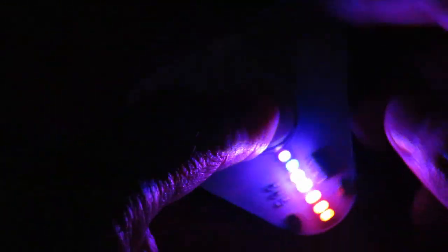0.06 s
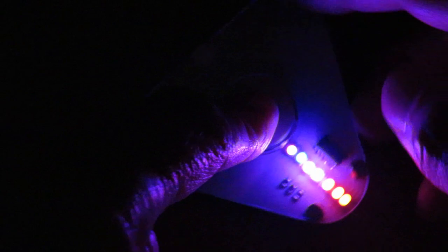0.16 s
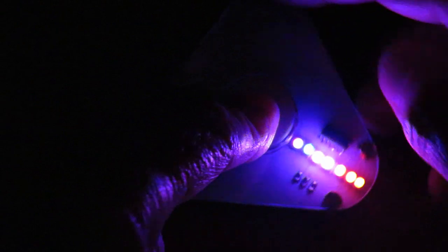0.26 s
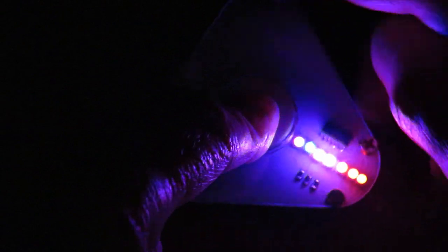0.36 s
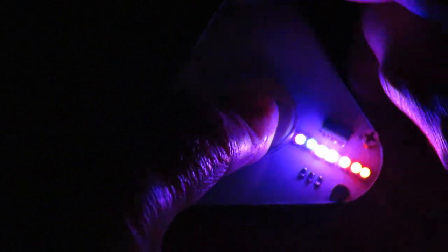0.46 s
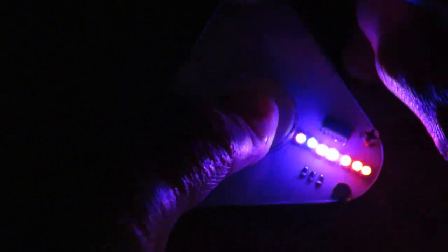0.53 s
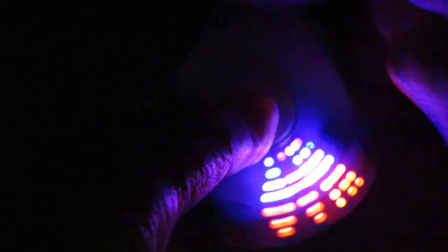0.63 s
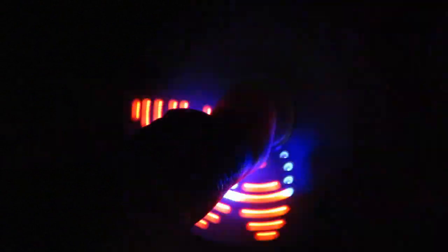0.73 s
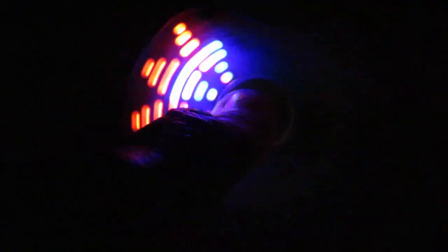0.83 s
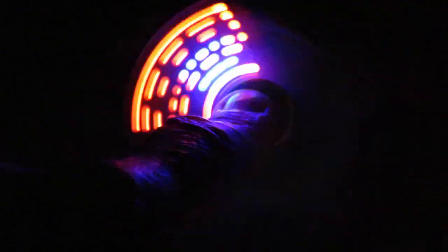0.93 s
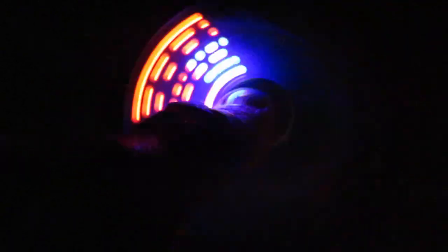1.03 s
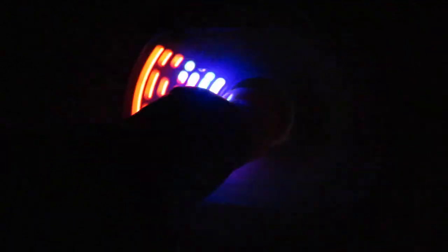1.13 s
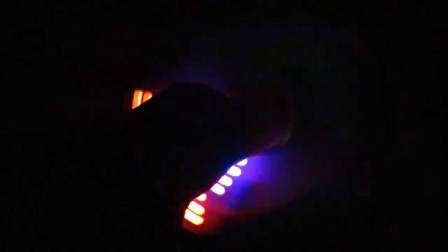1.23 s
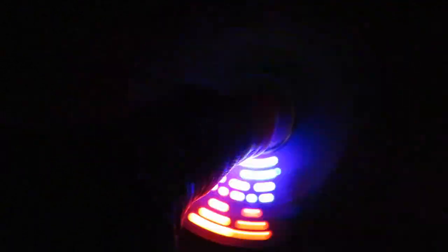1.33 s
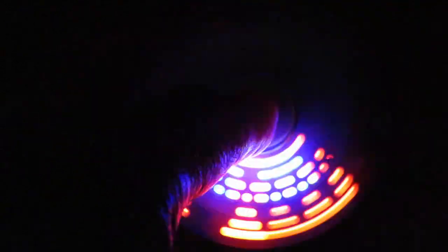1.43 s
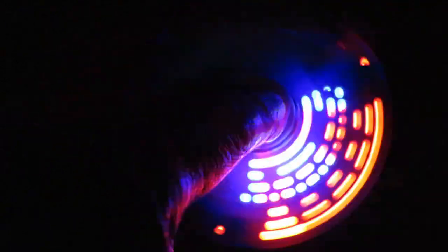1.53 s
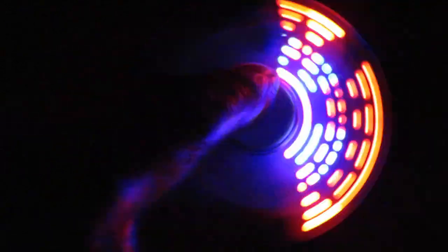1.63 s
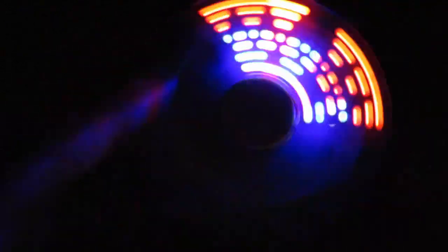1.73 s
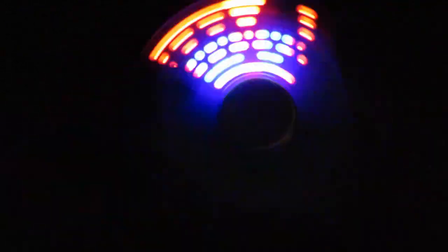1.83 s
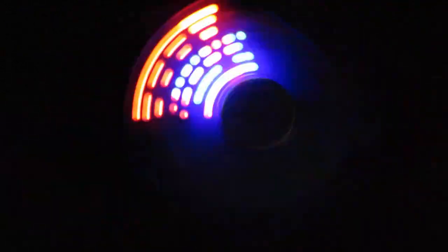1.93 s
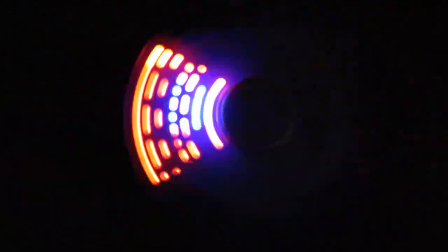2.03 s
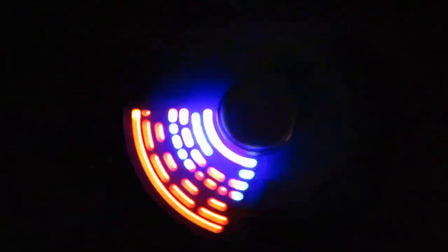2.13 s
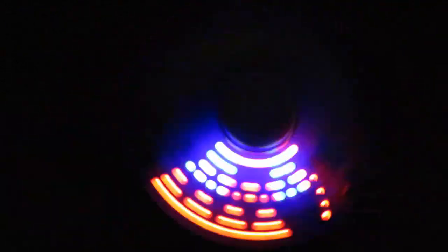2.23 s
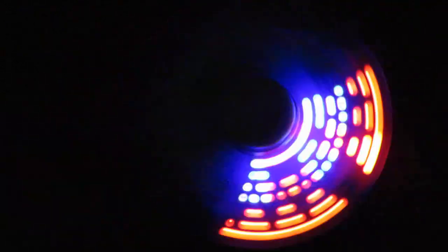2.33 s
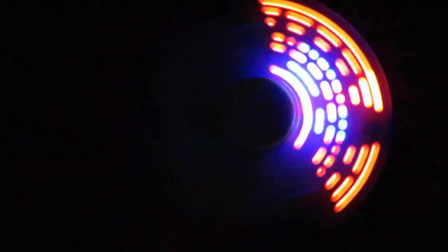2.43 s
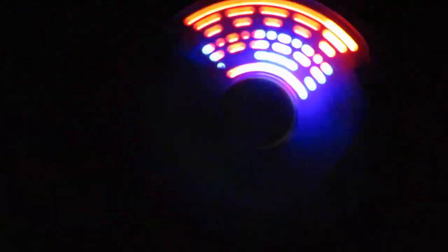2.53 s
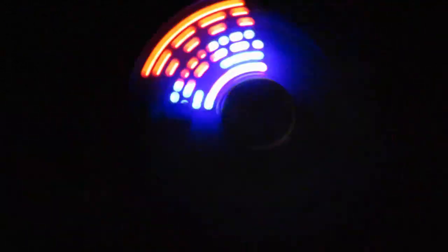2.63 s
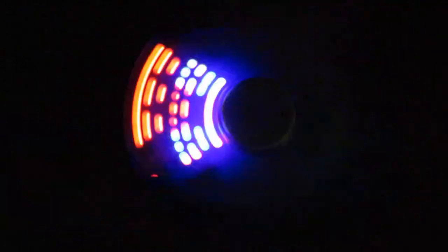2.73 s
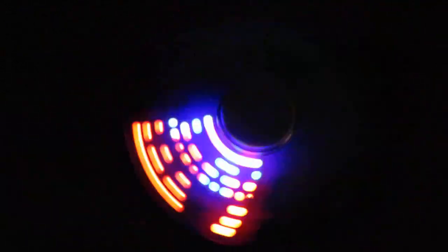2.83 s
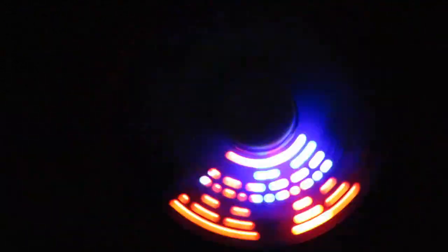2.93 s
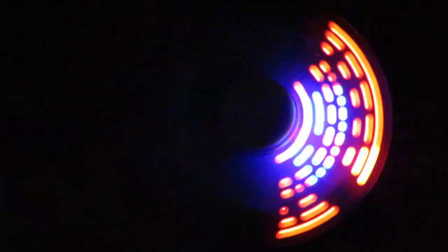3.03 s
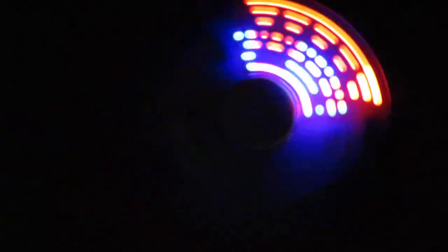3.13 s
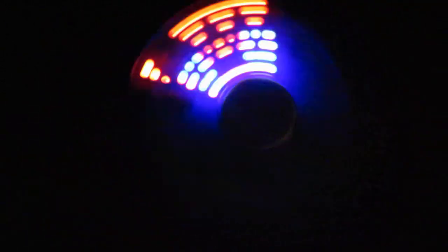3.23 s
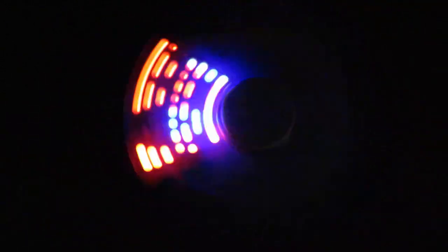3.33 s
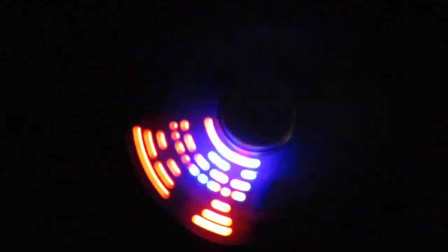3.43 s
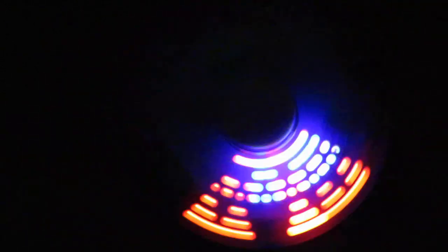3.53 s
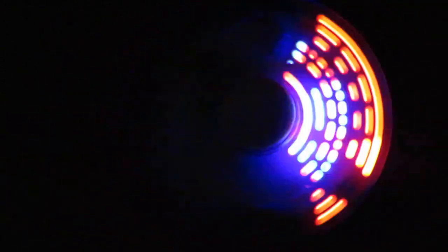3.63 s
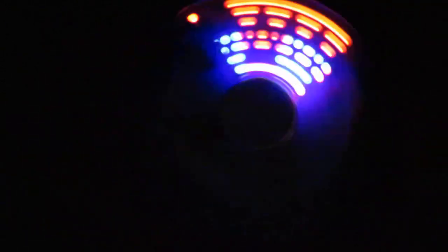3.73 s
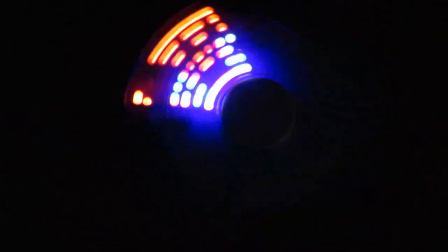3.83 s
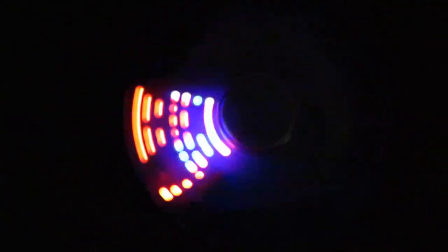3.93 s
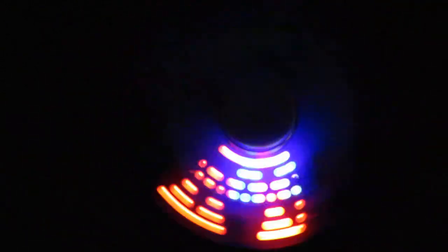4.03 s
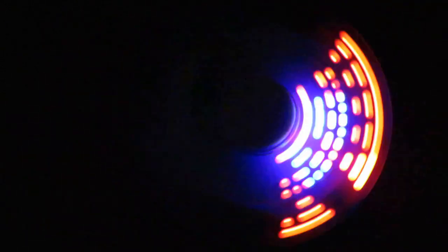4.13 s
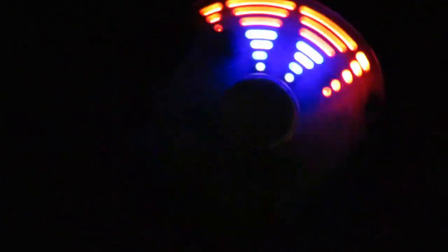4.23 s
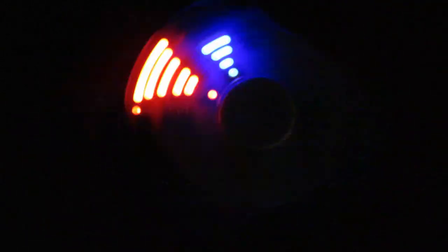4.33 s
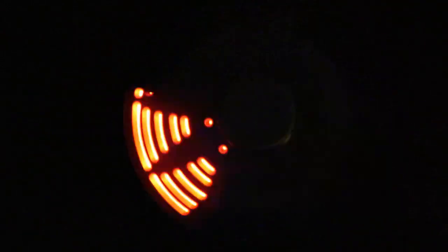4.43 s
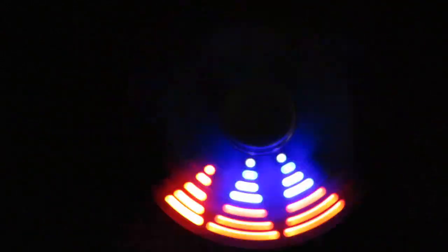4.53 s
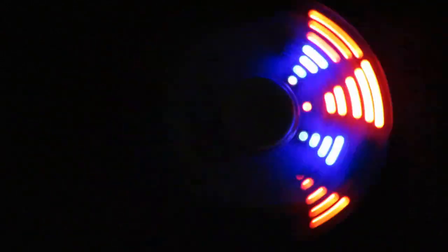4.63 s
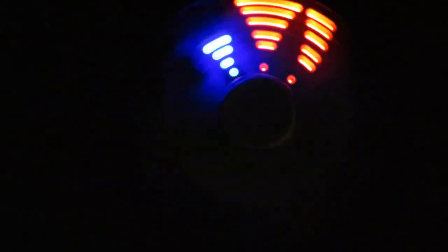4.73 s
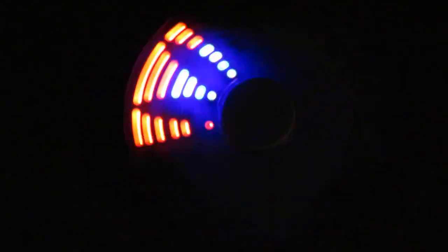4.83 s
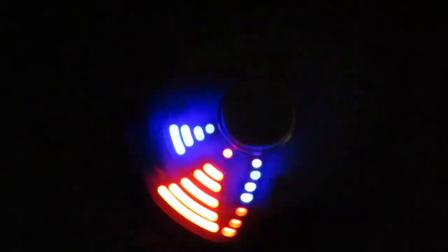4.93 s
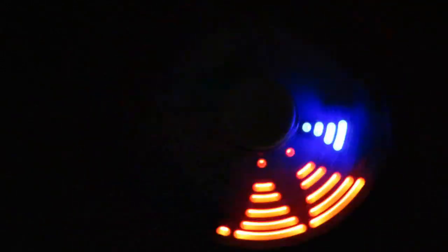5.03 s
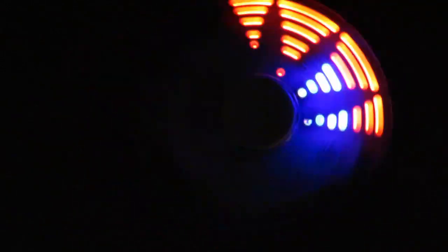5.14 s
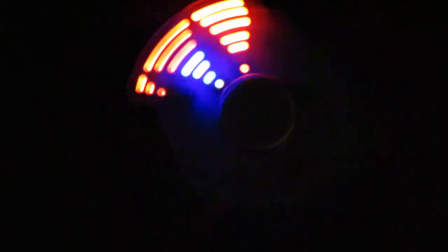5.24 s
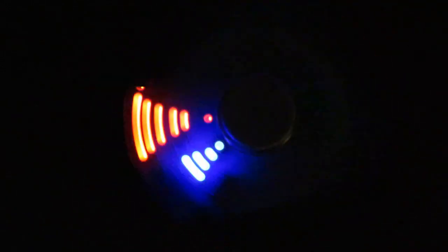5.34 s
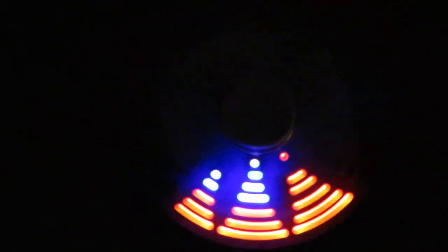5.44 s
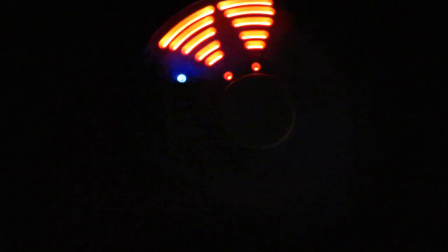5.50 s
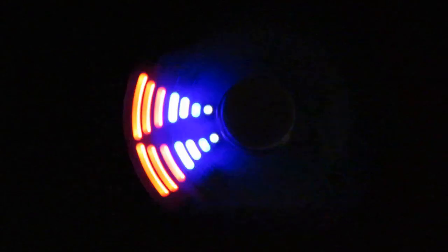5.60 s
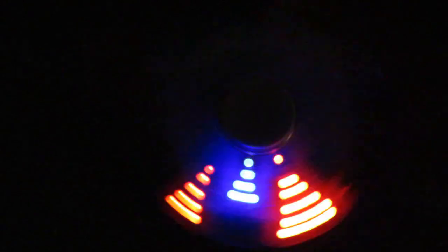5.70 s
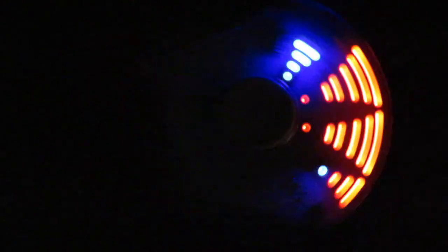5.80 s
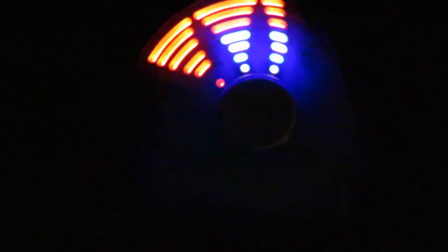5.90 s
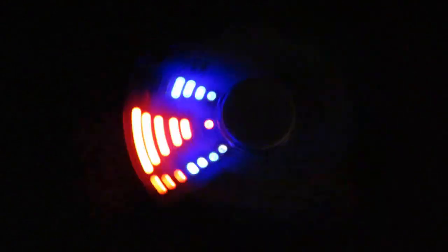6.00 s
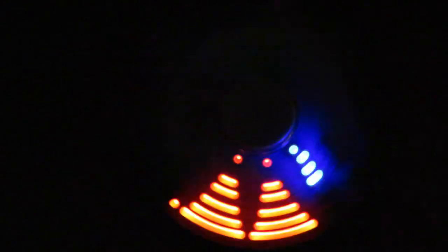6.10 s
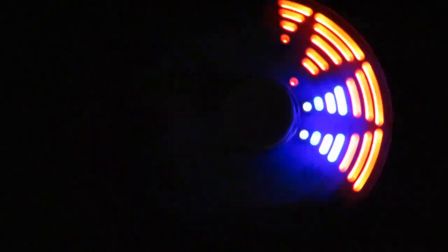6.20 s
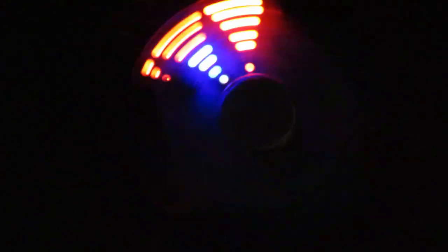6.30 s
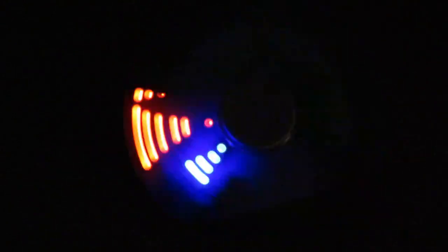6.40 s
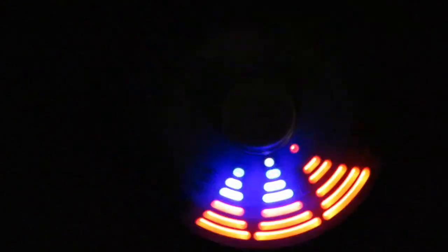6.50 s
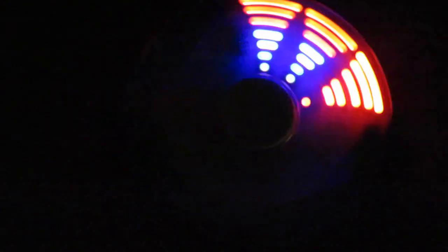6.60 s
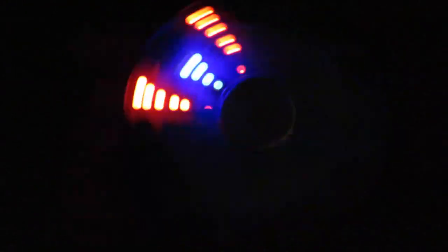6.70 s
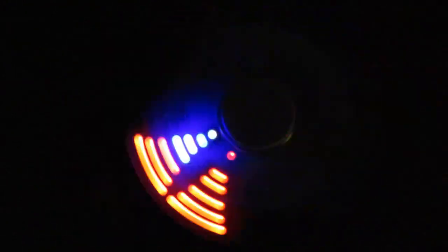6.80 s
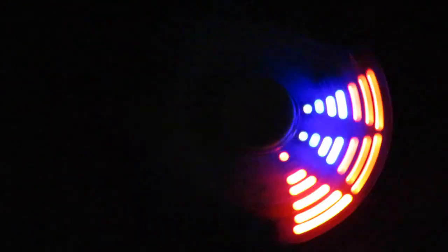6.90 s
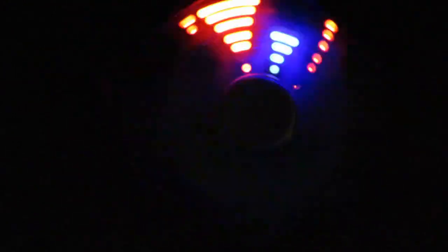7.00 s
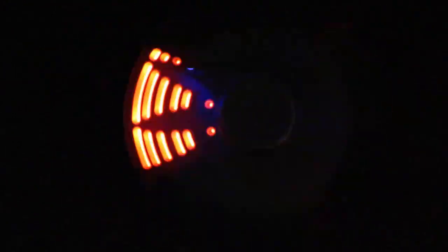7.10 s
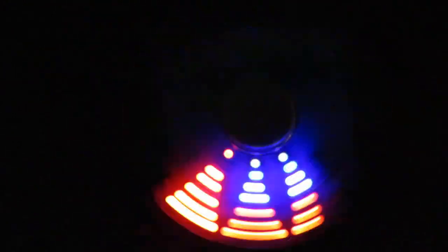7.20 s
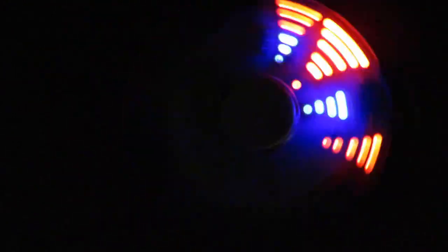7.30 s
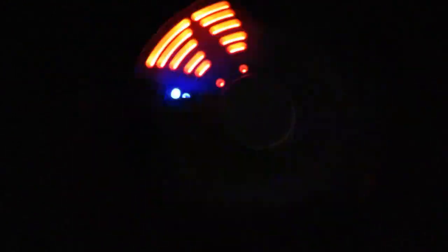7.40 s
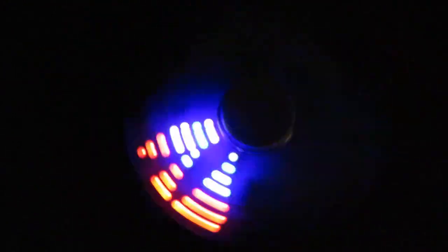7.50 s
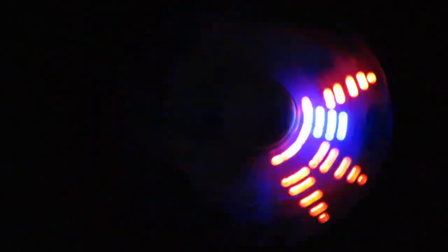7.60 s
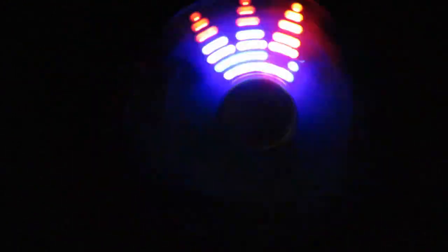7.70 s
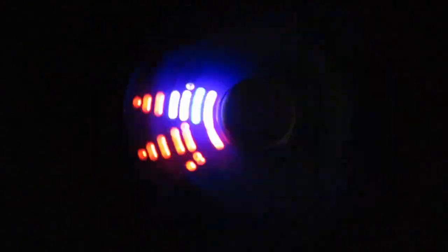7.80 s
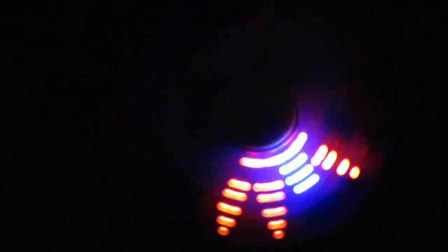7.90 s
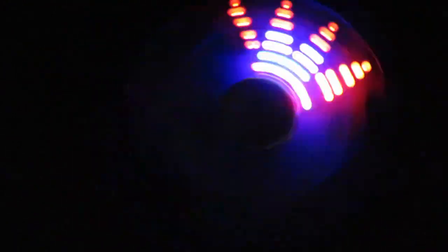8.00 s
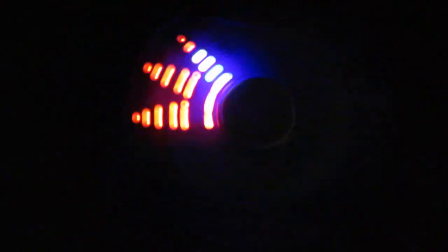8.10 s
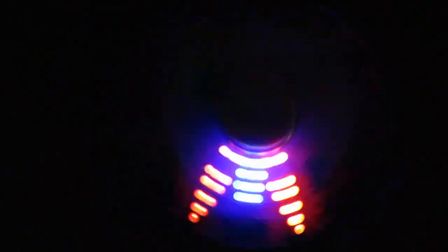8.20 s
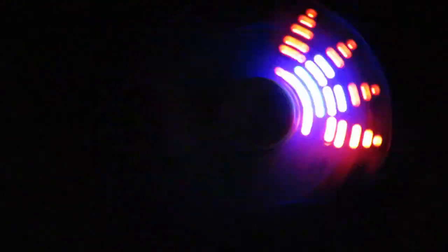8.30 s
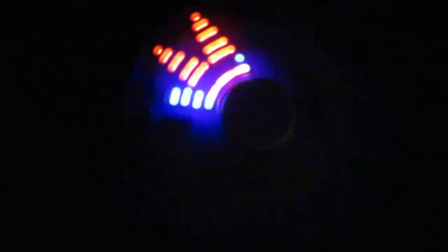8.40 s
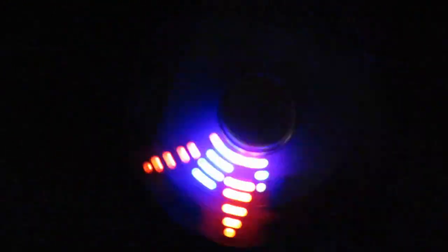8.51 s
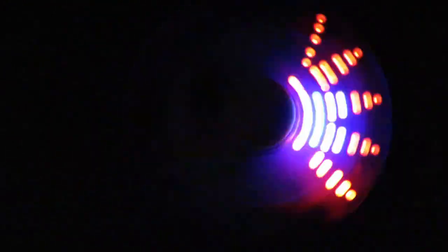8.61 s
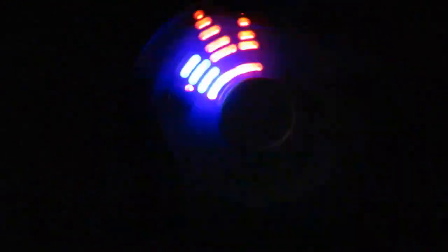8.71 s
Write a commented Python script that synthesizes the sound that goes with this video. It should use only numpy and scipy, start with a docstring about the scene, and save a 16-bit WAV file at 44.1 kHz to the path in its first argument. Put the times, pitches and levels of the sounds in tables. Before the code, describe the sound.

From 0 to about 0.85 seconds there is only a quiet room: distant low rumble, a faint wavering hum leaning slightly left, thin air noise and a tiny rustle of fingers at the start. At about 0.9 seconds a finger pushes and flicks a hand spinner, giving a sharp tick, a short bright scrape and a dull shake of the table. Until 1.6 seconds the pinned bearing whirs broadly and roughly, with uneven quick knocks thinning out by 1.3. Around 1.6 the finger lifts with soft bumps, and the rough noise fades over half a second into a free, steady metallic whir centred near 2 kHz. It has fine rattle, subtle rapid pulsing with each turn, occasional small ticks and low grinding surges. It loses level slowly and is still spinning at the end, about 8.7 seconds. The sound is close, central, with short reflections.

```python
"""In a quiet room, a hand spinner lies on a table; one finger pins its centre cap, another flicks it round.
The balls of the bearing rattle over the races (random clicks) and set body and table ringing (filters).
While the finger presses, the whirr is broad and knocks as the body wobbles; let go, the body rings freely
near 2 kHz and slowly gets quieter. Coloured noise and soft low tones make the room: rumble, hum, air, drones."""
import sys
import numpy as np
from scipy import signal
from scipy.fft import rfft, irfft
from scipy.io import wavfile

SR = 44100
rng = np.random.default_rng(int(sys.argv[2]) if len(sys.argv) > 2 else 0)


def waveform_to_disk(signal):
    """Save audio, clipped to [-1, 1], as 16-bit WAV at the path in sys.argv[1]."""
    frames = np.transpose(np.atleast_2d(signal))
    scaled = np.clip(frames, -1, 1) * 32767
    samples = np.round(scaled).astype(np.int16)
    wavfile.write(sys.argv[1], SR, samples)


N = 385875   # length of the sound in samples

# Colours: how strong each pitch is compared with the others; the overall level is set elsewhere.
# Each row: frequency in Hz, relative level in dB per Hz.
RUMBLE_COLOUR = [(12, -46), (20, -16), (48, -3.5), (102, 2), (128, -4), (155, 1), (256, -6), (300, -18),
                 (390, -31), (660, -120)]
HUM_COLOUR = [(71, -31), (120, -11.5), (314, -10.5), (445, -4), (484, -7.5), (592, -8.5), (617, -3),
              (731, -10), (1500, -39), (1950, -60), (3300, -120)]
WHINE_COLOUR = [(400, -60.5), (555, -22), (586, 0.5), (618, -21), (900, -57.5)]   # a narrow hum, mostly on the left
AIR_COLOUR = [(470, -35), (800, -14), (1030, -15), (1340, -12), (1520, -16.5), (3000, -23.5), (6900, -33),
              (13400, -43)]
RUSTLE_COLOUR = [(500, -26), (1400, -10), (1950, 3), (3000, -2), (6500, -18), (13000, -27)]
PRESSED_COLOUR = [(100, -44), (400, -25), (700, -10.5), (956, -9.5), (1390, -4), (2090, -6.5), (3800, -3),
                  (6900, -16.5), (8970, -40), (11200, -39), (13400, -50)]
SCRAPE_COLOUR = [(3000, -36), (6000, 10), (8000, -1), (11000, -11), (13400, -15)]
TABLE_COLOUR = [(50, -20), (120, -2.5), (200, -5), (323, 0.5), (400, -8.5), (614, 1), (900, -15),
                (1500, -26)]
FREE_COLOUR = [(180, -60), (400, -53), (580, -26), (740, -30), (1320, -20), (1550, -10.5), (1920, -1),
               (2290, -3.5), (2830, -14.5), (3870, -17.5), (5670, -24), (6900, -24.5), (8700, -48),
               (11200, -47), (13400, -62.5)]
GRIND_COLOUR = [(400, -30), (700, -8.5), (850, -4.5), (980, -5), (1090, -3), (1270, -5.5), (1500, -7),
                (2200, -36.5)]
RATTLE_COLOUR = [(2000, -34.5), (2800, -1), (3200, -2), (3900, -1.5), (4600, -5.5), (5400, -10.5),
                 (7000, -22.5), (9000, -45.5)]

# Colours of the parts that differ between the two channels: of the hum, and of the reflections.
# Each row: frequency in Hz, relative level in dB.
HUM_OPPOSED_COLOUR = [(150, -2.5), (260, 1.5), (350, 5), (450, -5.5), (800, 0.5), (1500, -4)]
SIDEWAYS_COLOUR = [(300, -15), (870, -3), (1690, -16.5), (3310, -13), (6450, -5), (12000, -3.5)]

# Peaks standing out of a colour, and dips in it.
# Each row: centre frequency in Hz, width in Hz, height in dB (negative for a dip).
RUMBLE_PEAKS = [(58.6, 10, 7), (81, 14, -6.5), (103, 8, 4), (151.6, 9.7, 4.5)]
HUM_PEAKS = [(255.2, 8.9, 9), (375, 54, -6), (449.4, 57, 9), (760, 11, 4), (824, 12, 14), (1020, 15, 13),
             (1340, 30, -1)]
BODY_MODES = [(1045, 8.2, 1), (1173, 170, -9), (1400, 57, 5), (1705, 65, 7), (1830, 16, 5.5),
              (1928, 47, 4.5), (2075, 27, 5), (2250, 59, 4), (2338, 60, 4), (2470, 42, 3), (2620, 85, 4.5),
              (2820, 84, -2), (3105, 160, 3), (3610, 24, -10), (3904, 220, 4), (4960, 87, -2.5),
              (5290, 107, 6.5), (5590, 190, -9), (6270, 54, 9.5), (6390, 47, 10), (7200, 250, -12),
              (7730, 690, 0), (9640, 690, 7), (10170, 290, 12), (11000, 630, 4.5), (12050, 460, -12),
              (13130, 500, 16)]   # ringing of body and table
WOBBLE_MODES = [(1366, 330, 15.5), (1740, 220, 14.5), (2110, 400, 13.5)]
SLOW_LEAN = [(1490, 500, 0.5), (2510, 640, 2)]   # how the free ring's colour has leaned upwards by the end
GRIND_MODES = [(1020, 30, 3), (1080, 21, 8.5), (1136, 25, 6.5), (1256, 26, 9.5)]

# Level curve of the distant rumble. Each row: time in seconds, level in dB.
RUMBLE_LEVEL = [(0, -72.5), (.45, -71.5), (1.0, -70), (1.56, -75), (6.2, -75), (8.75, -74.5)]
# The flicking finger touches, drags and pushes off. Each row: time in seconds, level in dB.
PUSH_LEVEL = [(.84, -92), (.865, -74), (.88, -52.5), (.897, -51), (.906, -43), (.911, -42)]
# Ticks of the flick and of single balls. Each row: time in seconds, strength before the body's filter in dB.
TICKS = [(.881, -37), (.911, -19), (.927, -28), (.948, -26), (1.005, -29), (1.033, -29), (1.189, -30),
         (2.4561, -32), (2.5424, -33), (3.1306, -33), (3.5656, -33), (4.2281, -33), (4.4306, -31),
         (5.3695, -33), (7.559, -35), (7.8139, -35)]
# Low drones that swell and fade far away.
# Each row: time of the crest in seconds, spread of the swell in seconds, average pitch in Hz, level in dB.
DRONES = [(.33, 0.086, 110.5, -68), (3.1, 0.3, 101, -70), (5.39, 0.28, 58, -74), (2.2, 0.3, 58.2, -79),
          (4.3, 0.27, 58.4, -83), (6.8, 0.13, 190, -75), (7.2, 0.15, 100.3, -81), (8.0, 0.21, 55, -77),
          (8.262, 0.1, 154, -70.5), (8.7, .1, 50, -72)]

# Short swells. Each row: time of the crest in seconds, level in dB, spread in seconds.
KNOCKS = [(0.915, -39.5, 0.0056), (0.977, -39.5, 0.011), (1.03, -48, 0.0097), (1.053, -44, 0.0046),
          (1.074, -41, 0.009), (1.143, -47, 0.01), (1.162, -43, 0.0054), (1.235, -49, 0.014),
          (1.271, -46, 0.0079)]   # the wobbling body loads the bearing while the finger pins it
BUMPS = [(1.148, -63, .012), (1.247, -79, 0.012), (1.604, -64.5, 0.035), (1.68, -67, .02)]     # softer bumps of the table under the pinning and lifting finger
SURGES = [(1.79, -60, .02), (1.893, -64, 0.027), (2.961, -69, 0.019), (3.547, -63.5, 0.018),
          (3.905, -64, 0.028), (4.052, -66, 0.016), (4.514, -68, 0.028), (4.837, -65, .03),
          (5.355, -66, 0.027), (6.985, -64.5, 0.051), (8.158, -64, 0.019), (8.565, -67, 0.019)]   # surges of the low grind

# room
HUM_DB, HUM_WAVER_DB = -68.5, 1.0
WHINE_DB, WHINE_WAVER_DB, WHINE_PAN_DB = -74, 1.5, 7   # pan: added on the left, taken off on the right
AIR_DB = -75
RUSTLE_S, RUSTLE_DB, RUSTLE_SPREAD_S = 0.041, -72, 0.06   # fingers settling on the spinner
DRONE_WAVER = 0.0293   # typical wander of the pitch, as a fraction of it

# the flick, the moment the pinning finger starts to lift, the time it takes to lift
FLICK_S, LET_GO_S, LIFT_S = 0.911, 1.633, 0.03
# pressed whirr, its surge after the flick, and what is left of it after the finger lifts
PRESSED_DB, SURGE_DB, SURGE_S = -46.5, 6, 0.16
UNPRESSED_DB, FADE_S = -59, 0.61
SCRAPE_DB, SCRAPE_S = -50, 0.22   # scrape at the flick; how fast it dies on top of the whirr's own changes
SHAKE_DB, SHAKE_RISE_S, SHAKE_DB_PER_S = -51.5, 0.022, 44   # the rise time is also the time it then holds
# free ring and its slow loss, which the whirr shares once let go
SPIN_DB, RUN_DOWN_DB_PER_S = -40, 0.6859
DAMPED_AT_FLICK_DB, DAMPED_AT_LET_GO_DB = -13, -5   # the finger mutes the free ring, less as it eases off
SETTLE_DB, SETTLE_S = -2.5, 0.15   # the ring starts this much lower and fills out once free
SNAGS_PER_S, SNAG_DB = 60.0, -17   # a ball snags sharply; level against the free rolling
# speed at the clock time, loss of speed, and the clock time
TURNS_PER_S, SLOWING_PER_S2, TURN_CLOCK_S = 8.78, 0.31, 1.792
GRIND_DB, GRIND_TURN_DB = -61.5, 1.5   # grind of the free bearing and its swing once a turn
RATTLE_DB, RATTLE_TURN_DB, RATTLE_LEAD_TURNS = -50.5, 1.2, 0.34   # upper rattle of the cage, likewise
STOP_HZ = 14144   # from here up the sound is at least 60 dB down


def from_db(db):
    """Gain of a level in dB."""
    return 10 ** (np.asarray(db) / 20)


def rms_one(x):
    """Scale to an average strength (rms) of 1."""
    return x / np.sqrt(np.mean(x ** 2) + 1e-20)


def level_curve(rows):
    """A table of time and dB, joined by straight lines at every sample."""
    seconds, db = np.transpose(rows)
    return np.interp(np.arange(N) / SR, seconds, db)


def bell(t, centre_s, db, spread_s):
    """Gain of a smooth swell that rises and falls around its centre."""
    return from_db(db) * np.exp(-0.5 * ((t - centre_s) / spread_s) ** 2)


def drift(rate_hz):
    """Slow random wandering of size 1: noise smoothed twice, made at every 20th sample."""
    r = np.exp(-2 * np.pi * rate_hz * 20 / SR)
    noise = rng.standard_normal(N // 20 + 4002)
    slow = signal.lfilter([1], [1, -2 * r, r * r], noise)[4000:]   # skip the filter's start
    return np.interp(np.arange(N) / 20, np.arange(len(slow)), rms_one(slow))


def response(colour, modes=(), order=14):
    """How something answers one click: a smooth colour with bell-shaped peaks and dips on it; energy 1."""
    size = 2 ** order
    hz = np.maximum(np.fft.rfftfreq(size, 1 / SR), 1)
    colour_hz, colour_db = np.transpose(colour)
    level_db = np.interp(np.log(hz), np.log(colour_hz), colour_db)
    for centre_hz, width_hz, mode_db in modes:
        level_db = level_db + mode_db / (1 + (2 * (hz - centre_hz) / width_hz) ** 2)
    # folding the cepstrum (spectrum of the log level) makes the answer start at once: minimum phase
    cepstrum = irfft(level_db * np.log(10) / 20)
    cepstrum[1:size // 2] *= 2
    cepstrum[size // 2 + 1:] = 0
    pulse = irfft(np.exp(rfft(cepstrum)))
    return pulse / np.sqrt(np.sum(pulse ** 2))


def through(x, pulse):
    """Let every sample of x set off the pulse (convolution), keeping the length."""
    return signal.fftconvolve(x, pulse)[:N]


def pair(colour, modes, side_db, side_colour=((100, 0), (1000, 0))):
    """Stereo noise: a part shared by both channels plus a part with opposite sign in each."""
    pulse = response(colour, modes)
    mid = through(rng.standard_normal(N), pulse)
    side = through(rng.standard_normal(N), pulse)
    side = rms_one(through(side, response(side_colour)))
    return mid + from_db(side_db) * side * [[1], [-1]]


def distant_rumble():
    """Low noise with a few resonances, nearly the same in both channels."""
    return from_db(level_curve(RUMBLE_LEVEL)) * pair(RUMBLE_COLOUR, RUMBLE_PEAKS, side_db=-27)


def hum():
    """Wavering noise with narrow resonances, a little stronger on the left."""
    level = from_db(HUM_DB + HUM_WAVER_DB * drift(3.0))
    noise = pair(HUM_COLOUR, HUM_PEAKS, side_db=0.0, side_colour=HUM_OPPOSED_COLOUR)
    return level * noise * from_db([[1.2], [-1.2]])


def whine():
    """One narrow band of wavering noise, much stronger on the left."""
    pan_db = WHINE_PAN_DB * np.array([[1], [-1]])
    level = from_db(WHINE_DB + WHINE_WAVER_DB * drift(12.0) + pan_db)
    return level * through(rng.standard_normal(N), response(WHINE_COLOUR))


def air():
    """Faint, wide, steady noise."""
    return from_db(AIR_DB) * pair(AIR_COLOUR, (), side_db=2.0)


def rustle(t):
    """The fingers settle on the spinner: one short swell of noise."""
    return bell(t, RUSTLE_S, RUSTLE_DB, RUSTLE_SPREAD_S) * pair(RUSTLE_COLOUR, (), side_db=-14)


def drones(t):
    """Soft low sine tones that swell and fade, with wandering pitch and level."""
    out = np.zeros(N)
    for centre_s, spread_s, hz, db in DRONES:
        wandering_hz = hz * (1 + DRONE_WAVER * drift(4.14))
        phase = 2 * np.pi * np.cumsum(wandering_hz) / SR
        out += bell(t, centre_s, db, spread_s) * from_db(2 * drift(2.6)) * np.sin(phase)
    return out


def room(t):
    """All the sounds around the spinner, added up."""
    return distant_rumble() + hum() + whine() + air() + rustle(t) + drones(t)


def contacts(per_s, spread_db, flicker_db):
    """Balls meeting rough spots of the races: random uneven clicks whose strength flickers; rms 1."""
    sizes = from_db(spread_db * np.minimum(rng.exponential(1, N), 5)) * rng.choice([-1, 1], N)
    hits = rng.random(N) < per_s / SR
    flicker = 0.11 * drift(2.7) + 0.94 * drift(38) + 0.5 * drift(140)
    return rms_one(sizes * hits * from_db(flicker_db * flicker))


def pressed_level(t):
    """Gain of the pressed whirr: the push, a dying surge, a hold, a fade when the finger lifts."""
    held_db = np.interp(t, [LET_GO_S, LET_GO_S + FADE_S], [PRESSED_DB, UNPRESSED_DB])
    held_db = held_db - RUN_DOWN_DB_PER_S * np.maximum(t - LET_GO_S, 0)
    surge_db = SURGE_DB * np.exp(-np.maximum(t - FLICK_S, 0) / SURGE_S)
    return from_db(np.where(t < FLICK_S, level_curve(PUSH_LEVEL), held_db + surge_db))


def pressed_whirr(t):
    """Dense clicks under the finger's load, plus single ticks, ring body and table broadly."""
    clicks = pressed_level(t) * contacts(6500.0, spread_db=3.0, flicker_db=0.83)
    for tick_s, db in TICKS:
        clicks[round(tick_s * SR)] += from_db(db)
    return through(clicks, response(PRESSED_COLOUR, BODY_MODES))


def finger_scrape(t):
    """The flicking finger scrapes brightly: uneven clicks that follow the whirr's level but die sooner."""
    fading = np.exp(-np.maximum(t - FLICK_S, 0) / SCRAPE_S)
    # taking off the whirr's own level at the flick leaves SCRAPE_DB there
    level = from_db(SCRAPE_DB - PRESSED_DB - SURGE_DB) * pressed_level(t) * fading
    return through(level * contacts(7000.0, spread_db=4.5, flicker_db=2.5), response(SCRAPE_COLOUR))


def table_shake(t):
    """The flick shakes the table through the pinned cap: a quick rise, a hold, a steady fall, soft bumps."""
    rise = np.clip(1 + (t - FLICK_S) / SHAKE_RISE_S, 0, 1) ** 4
    falling_s = np.maximum(t - FLICK_S - SHAKE_RISE_S, 0)
    bumps = sum(bell(t, *bump) for bump in BUMPS)
    level = rise * from_db(SHAKE_DB - SHAKE_DB_PER_S * falling_s) + bumps
    return through(level * contacts(2500.0, spread_db=1.0, flicker_db=1.5), response(TABLE_COLOUR))


def wobble(t):
    """The wobbling body loads the pinned bearing in knocks: short swells of clicks."""
    load = sum(bell(t, *knock) for knock in KNOCKS)
    clicks = load * contacts(4000.0, spread_db=2.0, flicker_db=0.8)
    return through(clicks, response(PRESSED_COLOUR, WOBBLE_MODES))


def free_level(t):
    """Gain of the free ring: muted by the finger, then released and slowly running down."""
    finger_db = np.interp(t, [FLICK_S, LET_GO_S, LET_GO_S + LIFT_S],
                          [DAMPED_AT_FLICK_DB, DAMPED_AT_LET_GO_DB, 0])
    since = np.maximum(t - LET_GO_S, 0)
    settle_db = SETTLE_DB * np.exp(-since / SETTLE_S)
    return from_db(SPIN_DB - RUN_DOWN_DB_PER_S * since + finger_db + settle_db) * (t > FLICK_S)


def free_ring(t):
    """Rolling and snagging balls ring the body freely; its colour slowly leans upwards."""
    rolling = contacts(3600.0, spread_db=2.0, flicker_db=1.0)
    snags = from_db(SNAG_DB) * contacts(SNAGS_PER_S, spread_db=2.0, flicker_db=2.5)
    clicks = free_level(t) * (rolling + snags)
    slowed = np.clip((t - LET_GO_S) / (t[-1] - LET_GO_S), 0, 1)   # 0 when let go, 1 at the end
    early = through(clicks * (1 - slowed), response(FREE_COLOUR, BODY_MODES))
    late = through(clicks * slowed, response(FREE_COLOUR, BODY_MODES + SLOW_LEAN))
    return early + late


def once_a_turn(t, swing_db, lead_turns):
    """Gain that swells on every turn of the slowing body."""
    since = t - TURN_CLOCK_S
    turns = TURNS_PER_S * since - SLOWING_PER_S2 * since ** 2 / 2
    return from_db(swing_db * np.cos(2 * np.pi * (turns + lead_turns)))


def grind_and_rattle(t):
    """Below and above the free ring the bearing grinds and rattles, swelling each turn; the grind surges."""
    running = free_level(t) / from_db(SPIN_DB)
    surges = sum(bell(t, *surge) for surge in SURGES)
    grind_level = from_db(GRIND_DB) * running * once_a_turn(t, GRIND_TURN_DB, 0) + surges
    grind = grind_level * contacts(2000.0, spread_db=2.5, flicker_db=2.0)
    rattle_level = from_db(RATTLE_DB) * running * once_a_turn(t, RATTLE_TURN_DB, RATTLE_LEAD_TURNS)
    rattle = rattle_level * contacts(4000.0, spread_db=3.0, flicker_db=1.0)
    return (through(grind, response(GRIND_COLOUR, GRIND_MODES))
            + through(rattle, response(RATTLE_COLOUR, BODY_MODES)))


def spinner(t):
    """All the sounds of spinner, fingers and table, added up."""
    return (pressed_whirr(t) + finger_scrape(t) + table_shake(t)
            + free_ring(t) + grind_and_rattle(t) + wobble(t))


def reflections(x, t60_s):
    """Random echoes from table and walls, falling 60 dB in t60_s; energy 1."""
    lag = np.arange(round(0.3 * SR)) / SR
    tail = rng.standard_normal(len(lag)) * from_db(-60 * lag / t60_s)
    return through(x, tail / np.sqrt(np.sum(tail ** 2)))


def scene():
    """The spinner in the middle, echoes behind it and to the sides, the room under it."""
    t = np.arange(N) / SR
    whirr = spinner(t)
    behind = from_db(-14) * reflections(whirr, t60_s=0.16)   # adds fine ripples to the spectrum
    side = from_db(-8.5) * through(reflections(whirr, t60_s=0.18), response(SIDEWAYS_COLOUR))
    return whirr + behind + side * [[1], [-1]] + room(t)


def record(dry):
    """Cut the very top of the treble with a steep low-pass filter."""
    return signal.sosfilt(signal.cheby2(12, 60, STOP_HZ, fs=SR, output="sos"), dry)


dry = scene()
out = record(dry)
waveform_to_disk(out)
```